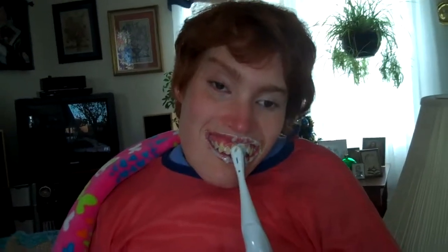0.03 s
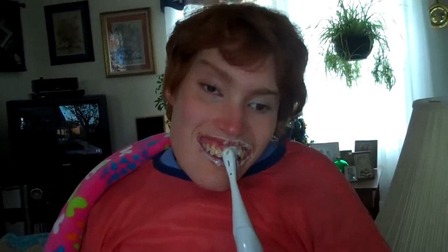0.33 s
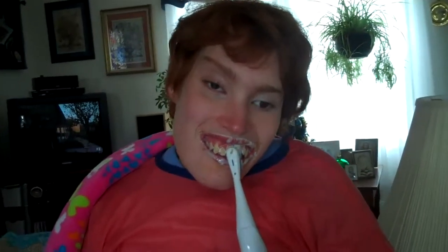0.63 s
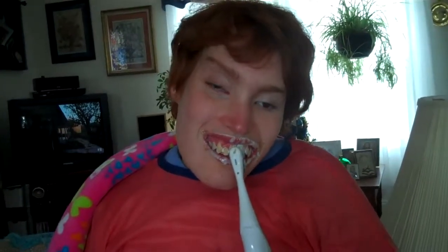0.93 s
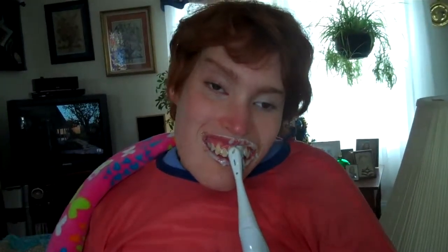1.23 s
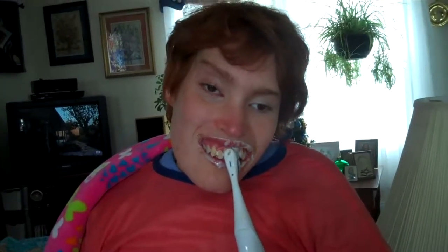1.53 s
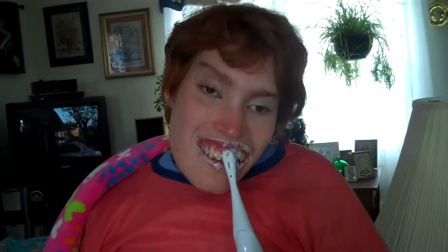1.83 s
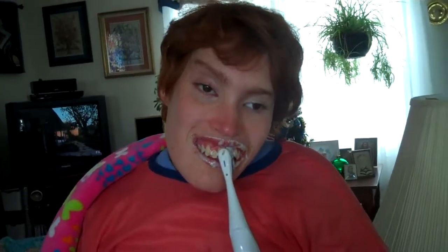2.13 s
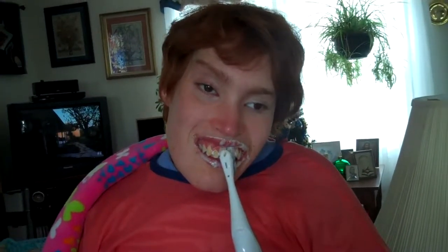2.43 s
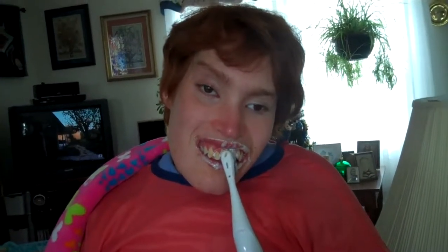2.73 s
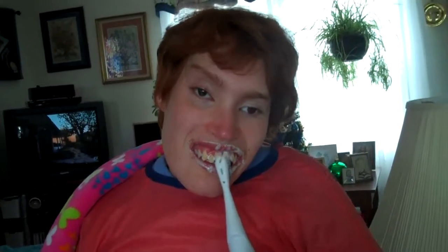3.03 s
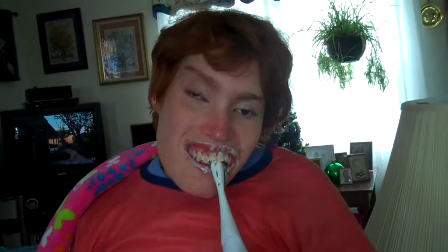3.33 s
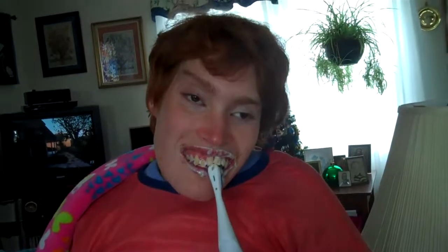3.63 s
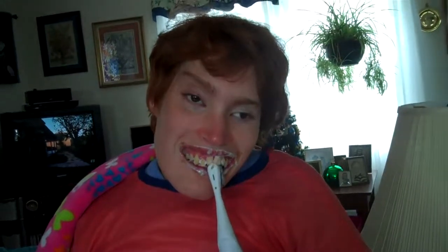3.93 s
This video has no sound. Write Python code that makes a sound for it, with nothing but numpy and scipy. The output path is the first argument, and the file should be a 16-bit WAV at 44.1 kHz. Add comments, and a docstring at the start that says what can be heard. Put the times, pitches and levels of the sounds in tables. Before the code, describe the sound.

An electric toothbrush buzzes and rattles against teeth in a quiet room.

```python
"""Electric toothbrush on teeth

A brush rattles close to two small microphones in a quiet living room. Its drive knocks several times in
each of about 45 strokes a second, and these impacts excite the resonances of the brush. Pressing slows it
and makes it knock harder; near the end it is eased off and runs faster and lighter. A whine pulses with
the strokes, the mouth pops once, and something like a small fan hums behind, with soft air and hiss."""
import sys
import numpy as np
from scipy import signal
from scipy.fft import rfft, irfft
from scipy.io import wavfile
from scipy.ndimage import uniform_filter1d, map_coordinates

SR = 44100
rng = np.random.default_rng(int(sys.argv[2]) if len(sys.argv) > 2 else 0)


def log_audio(samples):
    """Write samples as a 16-bit WAV file to the path given in sys.argv[1]."""
    # one column per channel
    frames = np.atleast_2d(samples).T
    # limit to full scale, then quantise
    limited = np.clip(frames, -1, 1)
    pcm = np.round(limited * 32767).astype(np.int16)
    wavfile.write(sys.argv[1], SR, pcm)


N = 176400

# Speed of the drive. Each row: time in seconds, stroke rate in Hz.
STROKE_RATE = [(0.0, 44.17), (0.2, 43.79), (0.5, 44.5), (0.6, 45.1), (0.95, 45.14), (1.3, 45.66),
               (1.65, 46.58), (2.3, 46.42), (2.5, 44.93), (2.65, 44.35), (2.85, 45.74), (3.0, 43.51),
               (3.26, 42.55), (3.33, 44.66), (3.45, 48.5), (3.62, 49.93), (4.0, 50.6)]
# Resonances of the brush. Each row: frequency in Hz, relative gain in dB at the left, then the right.
BRUSH_RESPONSE = [(100, -65, -43), (297, -37, -35), (1160, -31.5, -33), (1547, -21, -20),
                  (2850, -11.5, -11), (3120, -15, -15.5), (3860, -12, -11), (4260, -4, -4.5),
                  (5030, -7.5, -2.5), (5826, -3, 1.86), (6660, -7.5, -8), (7380, 0, -11.5),
                  (8330, -11.5, -22), (10500, -25, -37.5), (14000, -28.5, -44)]
BRUSH_DB, LEFT_LAG_S = 9, .000022
NEAR_DB, NEAR_T60_S, ROOM_DB, ROOM_T60_S = -20, 0.025, -14.5, 0.1


def toothbrush(t):
    """Source and filter: rattle and whine ring the brush and reflect off the face and the room."""
    turns = np.cumsum(curve(STROKE_RATE, t)) / SR  # one turn is one stroke
    drive = rattle(t, turns) + whine(t, turns)
    mid = drive.mean(axis=0)
    left, right = drive + undb(NEAR_DB) * echoes(mid, NEAR_T60_S) + undb(ROOM_DB) * echoes(mid, ROOM_T60_S)
    left = map_coordinates(left, [(t - LEFT_LAG_S) * SR], mode="nearest")
    hz, left_db, right_db = np.array(BRUSH_RESPONSE).T
    return np.array([colour(left, hz, left_db), colour(right, hz, right_db)]) * undb(BRUSH_DB)


# Strength of the rattle. Each row: time in seconds, relative level in dB.
RATTLE_SWELL = [(0, 0.5), (.75, 0), (1.25, -0.2), (2.05, -0.04), (2.2, 1), (2.6, 0), (2.87, -0.6),
                (3.0, -0.1), (3.25, -1), (3.55, -.5), (4, 1)]
# Rattle reaching each microphone by its own path. Each row: frequency in Hz, gain in dB.
SCATTER_SPECTRUM = [(500, -16), (2000, -19), (3500, -1), (5000, -7.5), (7000, -10.5), (9000, 1),
                    (12000, -0.5)]
KNOCK_DB, KNOCK_S, SCRUB_DB, SCRUB_S, BRISTLE_DB = -4, 0.00024, -27.5, 0.0013, -30.5


def rattle(t, turns):
    """Incoherent sources add in energy: brief contacts and scrubbing bristles shape noise; snaps top it."""
    hits = knocks(t, turns)
    contact = decay(decay(hits, KNOCK_S), KNOCK_S) * (undb(KNOCK_DB) / (KNOCK_S * SR)) ** 2
    bristles = decay(hits, SCRUB_S) * undb(SCRUB_DB) ** 2 + undb(BRISTLE_DB) ** 2
    force = undb(curve(RATTLE_SWELL, t)) * np.sqrt(contact + easing_gain(t) ** 2 * bristles)
    paths = force * rng.standard_normal((2, N))
    scattered = np.array([colour(path, *np.array(SCATTER_SPECTRUM).T) for path in paths])
    return snaps() + force * grit(t, turns) + scattered


# Load on the teeth. Each row: time in seconds, pressure (0 eased off, 1 normal, 2 hard).
TOOTH_PRESSURE = [(0, 1), (2.87, 1), (2.95, 2), (3.268, 2), (3.288, 0), (4, 0)]
# Impacts within one stroke. Each row: place, advance under hard pressure and timing scatter, all in
# turns, then relative level in dB when eased off, normal and hard.
STROKE_KNOCKS = [(0.193, .035, 0.0065, -5.5, -2.5, 3), (0.265, 0.06, 0.0087, -13, 1.5, 0.5),
                 (.305, .035, 0.018, -6, 0.5, 1.5), (.365, 0.049, 0.006, -5.5, 0.5, -4),
                 (0.397, 0.026, 0.012, -9, -9.5, -10), (0.519, 0.027, 0.049, -23, -45, -7),
                 (0.595, 0.022, 0.0054, -31, -1.5, -5), (0.676, 0.013, 0.006, -1, -5.5, -1),
                 (.725, .01, 0.023, -9, -4, 5), (0.779, 0.0012, 0.0084, -30, 0, 0.5),
                 (.84, .03, 0.017, -22, -2, -1), (0.898, 0.059, .01, -1, 2, 1),
                 (0.961, 0.057, 0.022, -1.5, -4, -9)]


def knocks(t, turns, count=200, spread_db=1.2):
    """Periodic impacts, as impulses of energy: pressure sets their force and pulls them earlier."""
    stroke, energy = np.arange(count), 0
    for place, advance, scatter, *levels in STROKE_KNOCKS:
        late, force = unit(uniform_filter1d(rng.standard_normal((count, 2)), size=3, axis=0)).T
        pressure = curve(TOOTH_PRESSURE, np.interp(stroke + place, turns, t))
        hit_turns = stroke + place - advance * np.maximum(pressure - 1, 0) + scatter * late
        when = np.interp(hit_turns, turns, t, right=2 * t[-1])
        db = np.interp(pressure, np.arange(len(levels)), levels) + spread_db * np.minimum(force, 1)
        energy = energy + clicks(when, undb(db) ** 2)
    return energy


def grit(t, turns, count=220, size=1000, likeness=.58, slip_s=.000025):
    """Roughness noise is correlated from stroke to stroke, as each rubs over nearly the same track."""
    roughness = rng.standard_normal((count, size))
    track = signal.lfilter([np.sqrt(1 - likeness ** 2)], [1, -likeness], roughness, axis=0)
    place = np.interp(t + slip_s * drift(210), t, turns) + 2
    return unit(map_coordinates(track.ravel(), [place * size], mode="wrap"))


def easing_gain(t, eased_db=-0.5):
    """Friction noise falls with load: this gain dips slightly when the brush is eased off."""
    return undb(eased_db * np.maximum(1 - curve(TOOTH_PRESSURE, t), 0))


# Hard strikes of the head on a tooth. Each row: time in seconds, relative level in dB.
TOOTH_SNAPS = [(.157, -5), (0.385, -3), (0.4818, -9), (0.7502, -2.5), (.808, -5), (.8743, -3), (.994, -1.5),
               (1.1173, -4.5), (1.3809, -3), (2.307, -9), (2.349, -10), (2.4241, -5), (2.5474, -5),
               (2.5703, -5), (2.5936, -0.5), (2.6391, -7), (2.646, -5), (2.759, -3.5), (2.9117, -3.5),
               (2.9795, -2), (3.0152, -3.5), (3.1322, -8), (3.2492, -3.5), (3.3675, -10.5), (3.3871, -9),
               (3.5615, -13), (3.5922, -8), (3.6121, -7), (3.633, -10.5), (3.7325, -9), (3.7525, -11),
               (3.7725, -8), (3.872, -7), (3.887, -9), (3.8925, -6), (3.9325, -11), (3.992, -9)]
# Spectrum of a strike. Each row: frequency in Hz, gain in dB.
SNAP_SPECTRUM = [(1000, -6), (2500, -9), (5000, 4), (8000, 3), (10500, 5), (13000, -8)]


def snaps(gain_db=6.5):
    """A short impact has a broad spectrum: the head snaps against a tooth, clean and bright."""
    when, db = np.array(TOOTH_SNAPS).T
    return colour(clicks(when, undb(db + gain_db)), *np.array(SNAP_SPECTRUM).T)


# Strength of the whine. Each row: time in seconds, relative level in dB.
WHINE_ENVELOPE = [(0, -6), (.7, -2), (1.3, -1), (1.6, 1.5), (2.1, 2), (2.4, -3), (2.65, 1), (3.1, -4),
                  (3.5, 2.5), (4, 2.5)]
# Swells within one stroke. Each row: lead over the main swell in turns, relative level in dB.
WHINE_SWELLS = [(0, 0.5), (.24, -9)]
SWELL_EASED, SWELL_PRESSED = (0.15, 0.078), (0.493, 0.049)  # main swell's place and width in turns
WHINE_ORDER, WHINE_DB, WHINE_SPREAD_DB = 64, -26.5, 1.7
WHINE_JITTER_RAD, WHINE_DRIFT_RAD = .6, 1.8


def whine(t, turns):
    """Amplitude modulation: a harmonic of the stroke rate, probably from gears, swells twice a stroke."""
    pressure = np.minimum(curve(TOOTH_PRESSURE, t), 1)
    place, width = (a + (b - a) * pressure for a, b in zip(SWELL_EASED, SWELL_PRESSED))
    sound = 0
    for lead, db in WHINE_SWELLS:
        from_peak = (turns - place + lead + .5) % 1 - .5
        swell = np.exp(-.5 * (from_peak / width) ** 2)
        phase = 2 * np.pi * WHINE_ORDER * turns + WHINE_JITTER_RAD * drift(640) + WHINE_DRIFT_RAD * drift(7)
        sound = sound + undb(db + WHINE_SPREAD_DB * drift(27)) * swell * np.sin(phase)
    return undb(WHINE_DB + curve(WHINE_ENVELOPE, t)) * sound


def echoes(x, t60):
    """Diffuse reflections decay exponentially and differ at each microphone."""
    t = np.arange(SR // 2) / SR
    tail = rng.standard_normal((2, len(t))) * np.exp(-np.log(1000) * t / t60) * (t > .001)
    tail /= np.sqrt(np.sum(tail ** 2, axis=1, keepdims=True))
    return signal.fftconvolve(x[None], tail, axes=1)[:, :N]


# Modes of a pocket of foam. Each row: frequency in Hz, level in dB, time to fall 60 dB in seconds.
POP_MODES = [(359, -40, 0.08), (980, -26.5, 0.027), (1163, -26, 0.025), (1213, -37, 0.11)]


def mouth_pop(t, start_s=2.8455, attack_s=0.0029):
    """Cavity resonance: a small pocket of foam opens and rings in damped modes."""
    age = np.maximum(t - start_s, 0)
    attack = 1 - np.exp(-(age / attack_s) ** 2)
    return attack * sum(undb(db) * np.sin(2 * np.pi * hz * age) * np.exp(-np.log(1000) * age / t60)
                        for hz, db, t60 in POP_MODES)


# Steady partials of the hum. Each row: frequency in Hz, level in dB, depth of waver from 0 to 1.
STEADY_PARTIALS = [(195, -66.5, 0.2), (293.6, -73.5, 0.75), (392.5, -73, 0.8), (515, -73.5, 0.35),
                   (786, -69, 0.34), (944, -69.5, 0.64), (1324, -63.5, 0.1), (1447, -66, .6)]
# Partials that swell and fade. Each row: frequency in Hz, then pairs of time in seconds and level in dB.
SWELLING_PARTIALS = [(583, [(0, -65.5), (.72, -71), (.86, -63), (1.15, -65.5), (1.5, -69), (1.69, -64),
                     (1.74, -71), (1.8, -52), (1.86, -62.5), (2.1, -65), (2.3, -72), (3.1, -67),
                     (3.23, -69), (3.4, -59.5), (3.74, -72), (3.83, -61.5), (4, -61)]), (885, [(0, -60),
                     (.16, -63), (.25, -60), (.42, -58.5), (.6, -63), (1.05, -67), (1.3, -74), (1.78, -64),
                     (1.89, -55), (1.97, -70), (2.09, -51.5), (2.2, -67), (3.5, -67), (4, -66)])]


def hum(t):
    """A line spectrum like that of a small fan; two of its partials swell and fade."""
    steady = sum(hum_partial(t, *row) for row in STEADY_PARTIALS)
    swelling = sum(hum_partial(t, hz, curve(levels, t), waver=0.37) for hz, levels in SWELLING_PARTIALS)
    return steady + swelling


def hum_partial(t, hz, db, waver, waver_hz=10.4):
    """Random modulation of amplitude and phase makes a tone waver."""
    wobble = 1 + waver * (drift(waver_hz) + 1j * drift(waver_hz))
    return undb(db) * np.sqrt(2) * np.real(wobble * np.exp(2j * np.pi * hz * t))


# Ambient noise of the room. Each row: frequency in Hz, relative spectral density in dB.
AIR_SPECTRUM = [(25, -13), (70, -21), (125, -17.5), (170, -6), (215, -2.5), (255, -6.5), (300, -2.5),
                (450, -5.5), (900, -1.5), (2000, -1), (8000, -36)]


def room_air(mid_db=-53, side_ratio_db=-7.5):
    """Partly coherent noise: one part is common to both microphones, a weaker one is in antiphase."""
    mid, side = (noise(AIR_SPECTRUM, size=8192) for _ in range(2))
    return undb(mid_db) * (mid + undb(side_ratio_db) * np.array([side, -side]))


# Treble hiss. Each row: frequency in Hz, relative spectral density in dB.
HISS_SPECTRUM = [(100, -20), (5000, -8), (9000, -5), (14000, 6)]


def hiss(t, left_db=-56, right_db=-78):
    """Faint uncorrelated noise, mostly on the left, which dips as the brush is eased off."""
    return easing_gain(t) * np.array([undb(db) * noise(HISS_SPECTRUM) for db in (left_db, right_db)])


def undb(db):
    """Amplitude ratio of a level in dB."""
    return 10 ** (np.asarray(db) / 20)


def unit(x):
    """Signal scaled to an RMS of 1."""
    return x / np.sqrt(np.mean(x ** 2))


def curve(rows, t):
    """Linear interpolation between rows of time and value."""
    return np.interp(t, *np.array(rows).T)


def colour(x, hz, db, size=1024):
    """Minimum-phase filter with the given spectrum, made causal by folding the cepstrum."""
    bins_hz = np.maximum(np.arange(size // 2 + 1) * SR / size, 1)
    gain = undb(np.interp(np.log(bins_hz), np.log(hz), db))
    cepstrum = irfft(np.log(gain))
    cepstrum[1:size // 2] *= 2
    cepstrum[size // 2 + 1:] = 0
    return signal.fftconvolve(x, irfft(np.exp(rfft(cepstrum))))[:N]


def noise(spectrum, size=1024):
    """Filtered white noise with an RMS of 1."""
    return unit(colour(rng.standard_normal(N), *np.array(spectrum).T, size=size))


def clicks(times, sizes):
    """Impulses at the given times."""
    return np.bincount(np.maximum(times * SR, 0).astype(int), sizes, N)[:N]


def decay(x, seconds):
    """Exponential fade after every impulse."""
    return signal.lfilter([1], [1, -np.exp(-1 / (seconds * SR))], x)


def drift(hz):
    """Smooth random motion with an RMS of 1."""
    span = int(SR / hz)
    smoothed = uniform_filter1d(rng.standard_normal(N), span, mode="wrap")
    return unit(uniform_filter1d(smoothed, span, mode="wrap"))


def scene():
    """Superposition: the sources add at the two microphones."""
    t = np.arange(N) / SR
    return toothbrush(t) + mouth_pop(t) + hum(t) + room_air() + hiss(t)


def record(dry, cutoff_hz=14100):
    """Band limiting: a steep low-pass filter cuts the top of the treble."""
    return signal.sosfilt(signal.ellip(8, .2, 70, cutoff_hz, fs=SR, output="sos"), dry)


dry = scene()
out = record(dry)
log_audio(out)
```